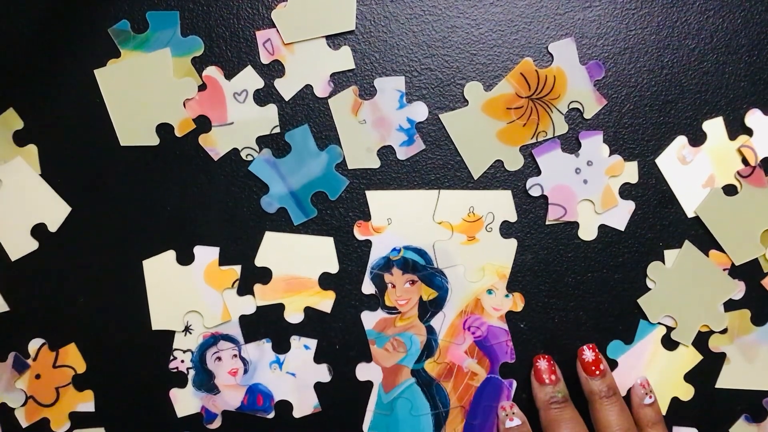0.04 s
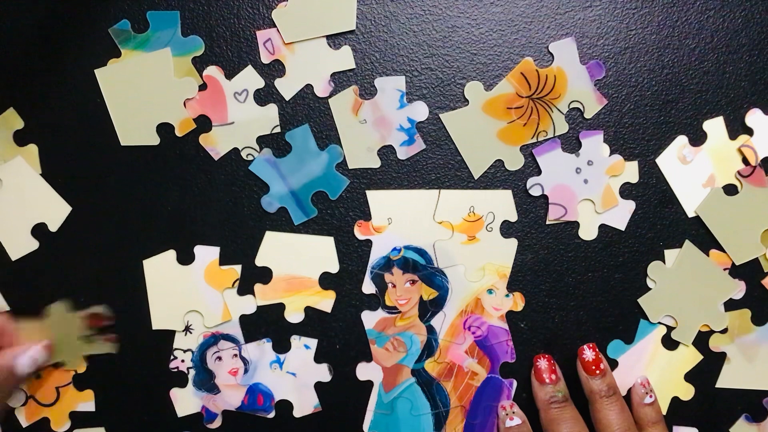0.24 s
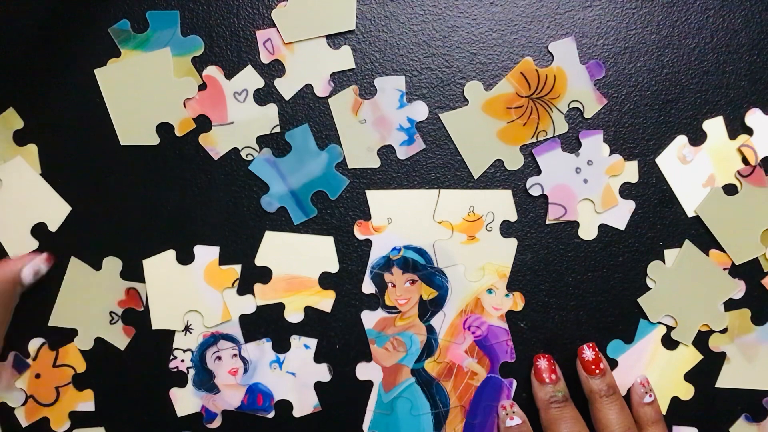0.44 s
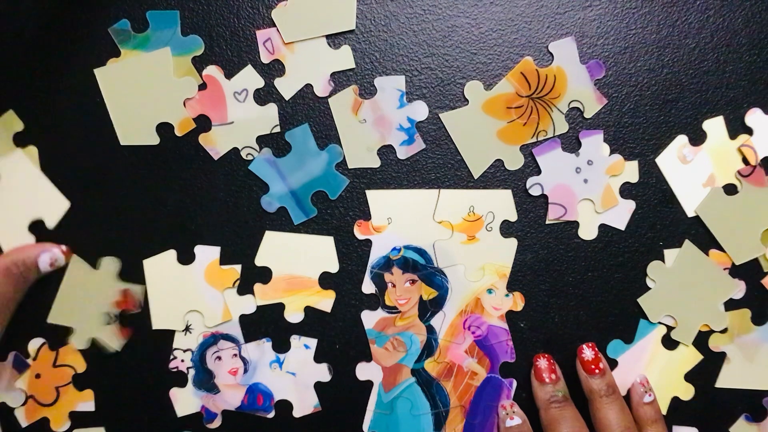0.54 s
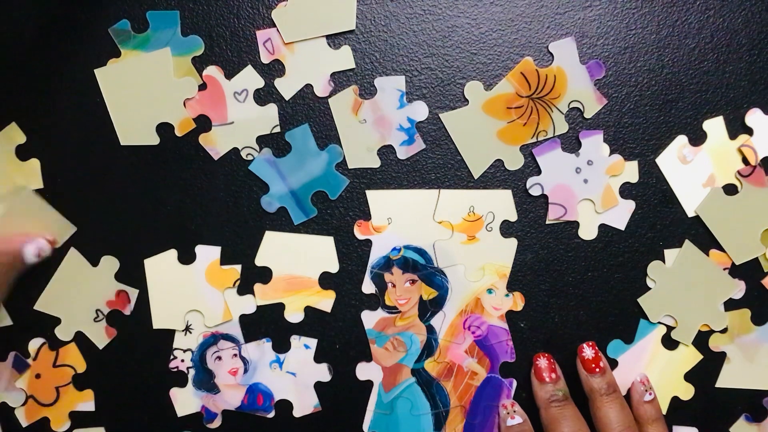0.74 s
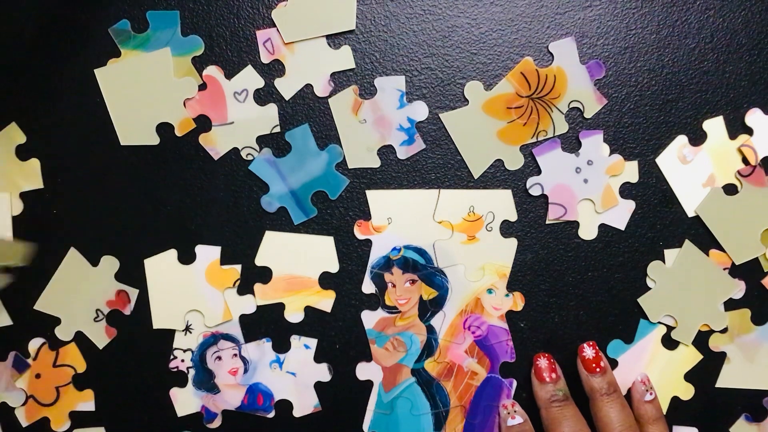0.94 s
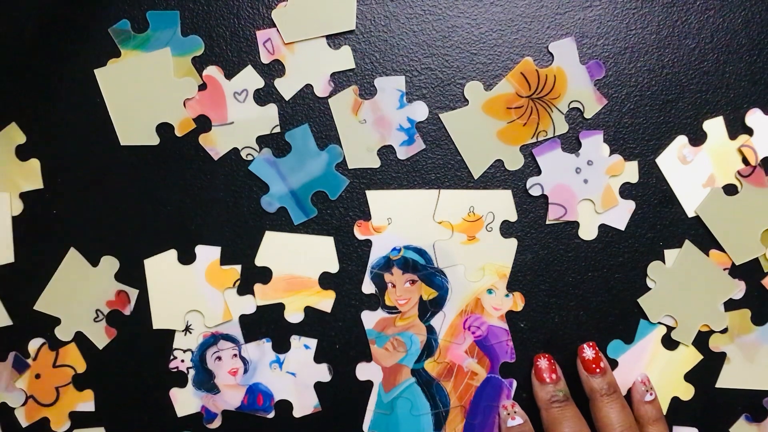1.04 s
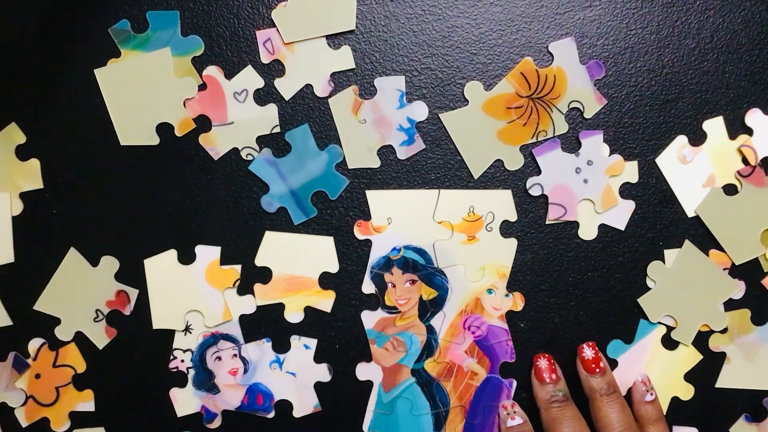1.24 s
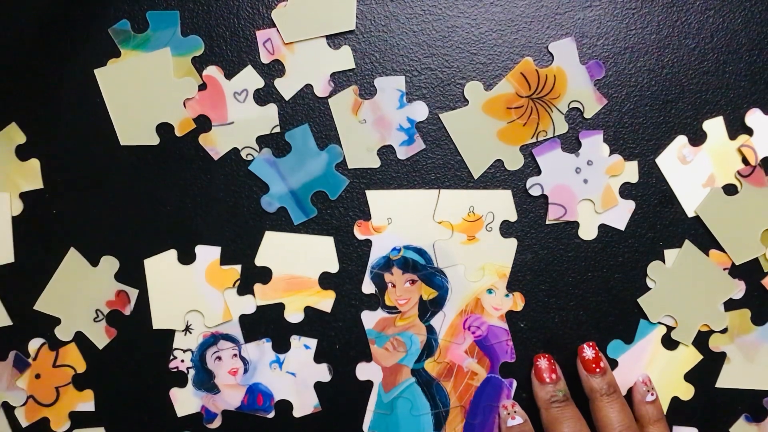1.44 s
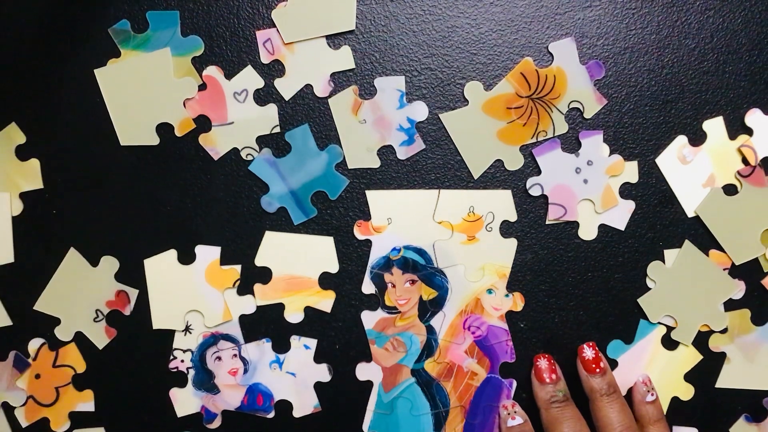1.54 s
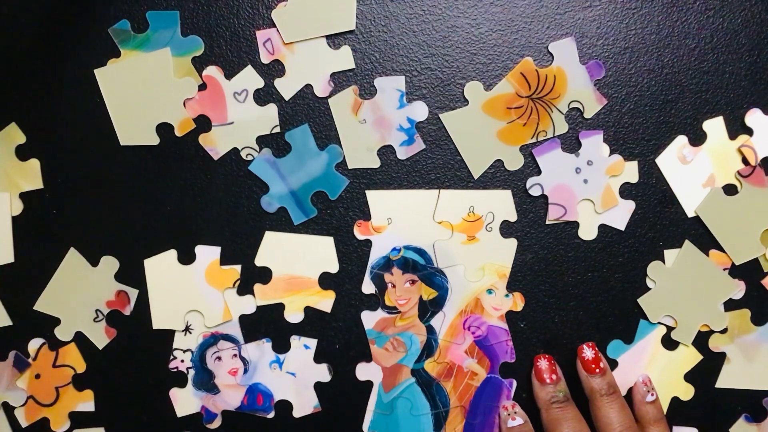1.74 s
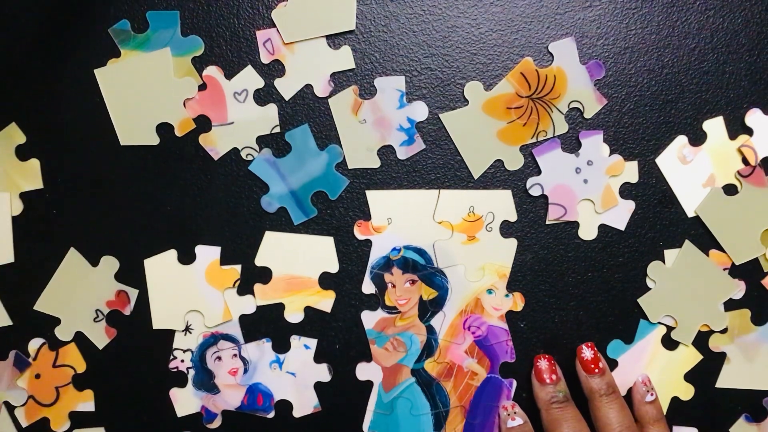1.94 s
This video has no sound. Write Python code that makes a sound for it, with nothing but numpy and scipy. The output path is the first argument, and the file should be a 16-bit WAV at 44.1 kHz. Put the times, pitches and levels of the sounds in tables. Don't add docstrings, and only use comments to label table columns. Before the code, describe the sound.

Cardboard puzzle pieces click and clack onto a hard tabletop, then slide faintly in a quiet room.

```python
import sys
import numpy as np
from scipy import signal
from scipy.io import wavfile
from scipy.ndimage import uniform_filter1d

SR = 44100
rng = np.random.default_rng(int(sys.argv[2]) if len(sys.argv) > 2 else 0)


def amplitude_ratio(level_db):
    exponent = np.asarray(level_db, float) / 20
    return 10 ** exponent


def generate_wav(sig):
    pcm = np.round(np.clip(np.atleast_2d(sig).T, -1, 1) * 32767).astype(np.int16)
    wavfile.write(sys.argv[1], SR, pcm)


N = 88200

# pitch in Hz, level in dB per Hz.
HUSH = [(24, -51), (40, 6.5), (773, -3.5), (967, -6.5), (1550, -12.5), (1850, -12), (5250, -21),
        (11400, -27), (15300, -28)]
HUSH_DB = -67
# pitch in Hz, width in Hz, level in dB.
HUSH_PEAKS = [(245, 27, -76), (725, 54, -79.5), (1280, 58, -78), (2230, 580, -80)]
# pitch in Hz, time to fall 60 dB in seconds.
ROOM = [(100, .22), (500, .23), (3000, .25), (8000, .27), (15000, .27)]
# delay in seconds, level in dB.
ECHOES = [(.0027, -15), (0.0106, -18.5)]
ROOM_DB, ROOM_LOW_DB, ROOM_TOP_HZ = -13, -9.5, 10200

# start in seconds, level in dB.
TINKS = [
    (.055, -64),
    (.091, -50.5),
    (0.259, -53.5),
    (.392, -66),
    (.406, -59),
    (1.087, -62),
]
TINK_HZ, TINK_T60_S, TINK_TAIL_DB = 15600, 0.045, -22
# start in seconds, level in dB, pitch in Hz.
SPECKS = [(.03, -59, 5060), (0.091, -58, 9600), (.322, -60, 8700), (0.427, -26.5, 4920), (.467, -52, 7040),
          (0.557, -67, 11500), (.592, -70, 14500), (0.668, -55, 5900), (0.901, -63.5, 8850),
          (1.089, -66, 8960), (1.749, -67, 9000)]
# start in seconds, length in seconds, level in dB, pitch in Hz, width in Hz.
RUB = (.98, .38, -81, 5200, 450)
# start in seconds, length in seconds, level in dB,
# pitch in Hz, width in Hz.
AIR = (.72, .135, -70, 11000, 8000)
# start in seconds, length in seconds, level in dB,
# pitch in Hz.
HUMS = [(.425, 0.067, -53, 156), (.542, 0.044, -43.5, 156), (.588, .075, -35.5, 159),
        (0.538, 0.034, -39, 343), (0.578, 0.029, -42, 318), (0.554, 0.043, -41, 83.4),
        (0.577, 0.12, -44, 99.8), (0.687, 0.034, -46.5, 263), (.69, 0.056, -43, 152),
        (.74, 0.072, -54.5, 154), (1.337, 0.053, -51.5, 284)]
# start in seconds, length in seconds,
# level in dB, pitch in Hz.
FLUTTERS = [(0.244, 0.0048, -43, 2880), (.280, 0.0063, -58, 3100), (.3478, 0.002, -44, 6200),
            (.348, 0.0028, -28.5, 2540), (0.344, 0.0034, -30, 10200), (0.3542, .005, -44, 6260),
            (.357, 0.0024, -40, 9800), (0.373, .012, -45, 3260), (0.542, 0.0022, -32.5, 3020),
            (0.553, 0.013, -39, 5100), (.554, 0.017, -44.5, 3040), (.555, .007, -53, 8500),
            (0.558, 0.0033, -50, 11500), (.560, 0.0058, -42, 6200), (.561, 0.0036, -51, 9500),
            (0.573, 0.0031, -46, 3000), (0.573, .005, -50, 5600), (.588, 0.0059, -43.5, 5300),
            (.591, 0.0067, -57, 8900), (.592, .003, -48, 14500), (0.604, 0.016, -55, 8950),
            (.609, 0.012, -49, 3050), (0.618, 0.0081, -49, 4300), (.652, 0.0031, -57, 3000),
            (0.667, 0.01, -51, 3070), (0.694, 0.0018, -34, 4900), (0.69, 0.0034, -30, 2137),
            (0.691, .002, -45, 9400), (.699, 0.0091, -40, 3250), (.700, 0.0038, -51, 9650),
            (0.714, 0.0092, -47, 3060), (0.7211, 0.0012, -41, 3080), (.726, 0.0062, -41.5, 3500),
            (.735, 0.0094, -59, 3310), (1.32, 0.021, -51.5, 2830), (1.3195, 0.0023, -45.5, 784),
            (1.332, 0.0092, -55, 2900), (1.333, 0.0032, -52, 5700), (1.393, 0.0034, -60, 2800),
            (1.381, 0.007, -52, 660)]
FLUTTER_WIDTH = 0.14

# start in seconds, length in seconds, table rumble in dB, deep thrum in dB,
# card scrape in dB.
SLIDES = [
    (0, 0.1, -67.5, -68, -76),
    (0.534, 0.051, -48.5, -54, -51),
    (0.563, 0.1, -51, -50.5, -58.5),
    (0.667, 0.096, -55, -58, -67),
    (0.8, 0.083, -69.5, -77, -73.5),
    (0.985, 0.49, -92, -96, -81.5),
    (1.362, 0.11, -73, -65.5, -79.5),
    (1.656, 0.16, -61.5, -71, -75.5),
    (1.76, 0.034, -58, -62, -64),
]
SLIDE_RISE, SLIPS_PER_S, SLIP_SPREAD_DB, SCRAPE_TOP_HZ = 0.2, 8000, 3.8, 10200

# pitch in Hz, level in dB, time to fall 60 dB in seconds.
TABLE = [(246.3, 4.5, 0.046), (300, -1, 0.088), (349.5, 2, 0.057), (420, 9, 0.035), (511.7, 6, 0.042),
         (610.6, 7, 0.033), (702, -9.5, 0.087), (771, -1.5, 0.059), (898, 2.5, 0.02), (1017, -7.5, 0.099)]
# pitch in Hz, level in dB, time to fall 60 dB in seconds.
DEEP = [(72, -10, 0.09), (101, -5, 0.11), (123.6, -21.5, 0.36), (159, -0.5, .18)]
PANEL_RISE_S, DEEP_RISE_S, MODE_SPREAD_DB = 0.00072, 0.0043, 3.0
# start in seconds, panel level in dB, deep thud in dB,
# favoured pitch in Hz.
KNOCKS = [(0.238, -33.5, -52.5, 450), (0.2446, -35, -71, 487), (0.255, -42, -57, 506),
          (.345, -25, -40.5, 514), (.353, -36, -41.5, 447), (0.428, -32.5, -46.5, 420),
          (.464, -35.5, -50.5, 525), (0.539, -37.5, -44, 306), (0.561, -35.5, -66, 300),
          (.582, -40.5, -36, 340), (0.604, -71, -59, 348), (0.689, -28, -43, 440),
          (.724, -42.5, -44.5, 486), (.755, -69, -58, 400), (1.3218, -41, -62, 524),
          (1.333, -48.5, -55.5, 330), (1.377, -45, -67, 725), (1.405, -56, -88, 300),
          (1.772, -47, -47, 550), (1.79, -73, -52, 330), (1.745, -51.5, -54.5, 615)]
FAVOUR_DB = 5.5

# start in seconds, level in dB, pitch in Hz,
# width in Hz.
SNAPS = [(.3451, -17.5, 6300, 1100), (.3452, -26, 10300, 2000), (.3474, -27, 5300, 1500),
         (.5408, -28, 8600, 1800), (.4636, -37, 5000, 1100), (.6888, -18, 3300, 1300),
         (.6886, -26, 6500, 1400), (.6886, -26, 9800, 1500), (.7244, -32, 3200, 800),
         (1.3787, -43, 1100, 900), (1.3785, -47, 4300, 1500), (1.7725, -49, 5000, 4000),
         (.5410, -32, 3100, 1200)]
SNAP_S, SNAP_GRIT = 0.00029, 0.35
# start in seconds, hollow click in dB, face slap in dB, edge crack in dB,
# edge pitch in Hz.
TAPS = [(0.2375, -44.5, -54.5, -66, 4600), (0.2488, -46, -62, -79, 5400), (0.3419, -34, -38.5, -32.5, 6500),
        (0.345, -25, -45, -26, 6360), (0.3568, -45, -43, -63, 6020), (0.4264, -35, -39, -31, 5240),
        (0.4411, -40, -51, -71, 5000), (0.4626, -40, -49.5, -43, 4230), (0.4827, -44.5, -49.5, -59, 4400),
        (0.5404, -34.5, -44, -30.5, 7650), (0.5566, -64, -64, -46, 5800), (0.5896, -61, -80, -61, 4660),
        (0.6218, -56, -66, -52.5, 4460), (0.6528, -55, -54.5, -72, 6380), (0.6884, -25.5, -36, -24, 6070),
        (0.7245, -28.5, -48.5, -50, 4900), (1.3223, -60, -48, -54, 6060), (1.333, -62, -62, -57, 5600),
        (1.3781, -49, -44, -77, 4510), (1.7478, -48, -53, -56.5, 8700), (1.7715, -50, -48, -50, 5200)]
# pitch in Hz, width in Hz, level in dB.
HOLLOW = [(2550, 1700, -13.5), (3020, 364, 10), (3590, 310, -7), (4680, 2000, -3)]
# pitch in Hz, width in Hz, level in dB.
SLAP = [(1020, 910, 0.5), (1450, 350, 5), (2040, 400, -1.5)]
# pitch in Hz, width in Hz, level in dB.
EDGES = [(4300, 1980, -17), (4660, 770, -1), (6020, 1900, -10), (7920, 3600, -37), (9320, 1100, -10.5),
         (11630, 4200, -15), (14500, 5100, -15.5)]
OWN_WIDTH_HZ, OWN_DB = 320, -2.5
CLICK_DB, SLAP_DB, EDGE_DB = -1, 4, 2
CRACK_S, CHATTER_DB, CHATTER_S = 0.00029, -5.5, 0.0038
HARD_DB, SOFTEN_DB = -28.5, 17
SOFT_SIDE_DB = -3.5


def evened(x):
    return x / np.sqrt(np.mean(x ** 2) + 1e-20)


def peaked(x):
    return x / abs(x).max()


def read(points, hz):
    f, value = np.transpose(points)
    return np.interp(np.log(hz + 1), np.log(f + 1), value)


def add(mix, s, sound):
    part = mix[max(round(s * SR), 0):][:len(sound)]
    part += sound[:len(part)]


def progress(length_s):
    return np.arange(0, length_s, 1 / SR) / length_s


def dull(x, hz):
    return signal.sosfilt(signal.butter(2, min(hz, 0.45 * SR), fs=SR, output="sos"), x)


def resonate(x, hz, width_hz):
    r = np.exp(-np.pi * width_hz / SR)
    return signal.lfilter([1 - r, 0, r - 1], [1, -2 * r * np.cos(2 * np.pi * hz / SR), r * r], x)


def bank(x, peaks):
    return sum((-1) ** k * amplitude_ratio(db) * resonate(x, hz, w) for k, (hz, w, db) in enumerate(peaks))


def ring(modes, rise_s, chance):
    t = np.arange(SR // 3) / SR
    x = 0
    for k, ((hz, db, t60), c) in enumerate(zip(modes, chance)):
        level = amplitude_ratio(db + MODE_SPREAD_DB * c - 60 * t / t60)
        x = x + (-1) ** k * level * np.sin(2 * np.pi * hz * t)
    return peaked(x * (1 - np.exp(-t / rise_s)))


def crack(noise, length_s):
    t = np.arange(len(noise)) / SR
    chatter = amplitude_ratio(CHATTER_DB) * np.exp(-t / CHATTER_S) * noise[::-1] ** 2 / 2
    return noise * (1 - np.exp(-2 * t / length_s)) * (np.exp(-t / length_s) + chatter)


def hush():
    frames, hz = N // 256 + 5, np.fft.rfftfreq(1024, 1 / SR)
    a, b, patches = rng.standard_normal((frames, 513, 3)).T
    patches = evened(uniform_filter1d(uniform_filter1d(patches, 12, 0), 14, 1))
    spectrum = (a + 1j * b) * amplitude_ratio(read(HUSH, hz)[:, None] + 1.1 * patches)
    noise = signal.istft(spectrum, nperseg=1024, noverlap=768)[1][:N]
    humps = sum(amplitude_ratio(db) * evened(resonate(rng.standard_normal(N), f, w)) for f, w, db in HUSH_PEAKS)
    return amplitude_ratio(HUSH_DB) * evened(noise) + humps


def room(x, start_s):
    hits = np.zeros(SR // 2)
    at = np.arange(0, SR // 2 - 20, 10)
    hits[at + rng.integers(0, 10, at.shape)] = rng.choice([-1., 1.], at.shape)
    hz, t, z = signal.stft(hits, SR, nperseg=256)
    tail = signal.istft(z * amplitude_ratio(-60 * t / read(ROOM, hz)[:, None]), SR, nperseg=256)[1]
    tail = tail * np.clip(np.arange(len(tail)) / (start_s * SR), 0, 1)
    return signal.fftconvolve(x, tail / np.linalg.norm(tail))[:N]


def bangle_tinks():
    out, t = np.zeros(N), np.arange(SR // 5) / SR
    fall = amplitude_ratio(-60 * t / TINK_T60_S) + amplitude_ratio(TINK_TAIL_DB - 60 * t / 0.25)
    shape = np.minimum(t / 0.00091, 1) * fall
    for s, db in TINKS:
        noise = rng.standard_normal(len(t))
        fuzz = evened(resonate(resonate(noise, TINK_HZ, 295), TINK_HZ, 295))
        add(out, s, amplitude_ratio(db) * fuzz * shape)
    return out


def specks():
    out = np.zeros(N)
    for s, db, hz in SPECKS:
        add(out, s, amplitude_ratio(db) * peaked(resonate(crack(rng.standard_normal(900), 0.0015), hz, 0.3 * hz)))
    return out


def fingertip_rub():
    out = np.zeros(N)
    s, length, db, hz, width_hz = RUB
    u = progress(length)
    noise = evened(resonate(rng.standard_normal(len(u)), hz, width_hz))
    add(out, s, amplitude_ratio(db) * np.sin(np.pi * u) ** 0.5 * noise)
    return out


def settling_hiss():
    out = np.zeros(N)
    s, length, db, hz, width_hz = AIR
    u = progress(length)
    noise = evened(resonate(rng.standard_normal(len(u)), hz, width_hz))
    add(out, s, amplitude_ratio(db) * np.minimum(10 * u, 1) * (1 - u) * noise)
    return out


def hums():
    out = np.zeros(N)
    for s, length, db, hz in HUMS:
        t = np.arange(0, length, 1 / SR)
        swell = np.sin(np.pi * (t / length) ** 0.46)
        add(out, s, amplitude_ratio(db) * swell * np.sin(2 * np.pi * hz * t))
    return out


def flutters():
    out = np.zeros(N)
    for s, length, db, hz in FLUTTERS:
        u = np.minimum(np.arange(1200) / SR / length, 1)
        rub = rng.standard_normal(1200) * np.sin(np.pi * np.sqrt(u))
        width_hz = FLUTTER_WIDTH * hz
        add(out, s, amplitude_ratio(db) * peaked(resonate(resonate(rub, hz, width_hz), hz, 2 * width_hz)))
    return out


def scrape(slips, patch):
    out = 0
    peaks = SLAP + HOLLOW + EDGES
    for k, (hz, w, db) in enumerate(peaks):
        out = out + amplitude_ratio(db) * resonate(slips * (patch % len(peaks) == k), hz, w)
    return dull(out, SCRAPE_TOP_HZ)


def slides():
    high, low = np.zeros(N), np.zeros(N)
    slips = (rng.random((3, N)) < SLIPS_PER_S / SR) * rng.choice([-1., 1.], (3, N))
    slips = slips * amplitude_ratio(SLIP_SPREAD_DB * np.minimum(rng.exponential(1, (3, N)), 4))
    calm = np.zeros(16)
    bodies = [ring(TABLE, 0.00078, calm), ring(DEEP, 0.0012, calm)]
    patch = rng.integers(0, 840, N)
    for s, length, rumble_db, thrum_db, scrape_db in SLIDES:
        u = progress(length)
        shape = np.minimum(u / SLIDE_RISE, 1) * np.sqrt(np.clip(1 - u, 0, 1))
        start = round(s * SR)
        drive = slips[:, start:][:, :len(u)] * shape
        for d, body, db in zip(drive, bodies, (rumble_db, thrum_db)):
            x = signal.fftconvolve(d, body)
            add(low, s, amplitude_ratio(db) * x / np.sqrt(np.mean(x[:len(u)] ** 2)))
        add(high, s, amplitude_ratio(scrape_db) * evened(scrape(drive[2], patch[start:][:len(u)])))
    return high, low


def table_knocks():
    out = np.zeros(N)
    for s, panel_db, thud_db, centre_hz in KNOCKS:
        chance = rng.standard_normal(16)
        panel = [(hz, db - FAVOUR_DB * np.log2(hz / centre_hz) ** 2, t60) for hz, db, t60 in TABLE]
        add(out, s, amplitude_ratio(panel_db) * ring(panel, PANEL_RISE_S, chance))
        add(out, s, amplitude_ratio(thud_db) * ring(DEEP, DEEP_RISE_S, chance[-4:]))
    return out


def snaps():
    out, t = np.zeros(N), np.arange(600) / SR
    for s, db, hz, width_hz in SNAPS:
        blow = (t == 0) + SNAP_GRIT * rng.standard_normal(600) * np.exp(-t / SNAP_S)
        add(out, s, amplitude_ratio(db) * peaked(resonate(resonate(blow, hz, width_hz), hz, width_hz)))
    return out


def card_taps():
    out = np.zeros(N)
    for s, click_db, slap_db, edge_db, hz in TAPS:
        a, b, c = rng.standard_normal((3, 1500))
        softness = max(HARD_DB - max(click_db, edge_db), 0) / SOFTEN_DB
        length_s = CRACK_S * 2 ** softness
        hollow = [(f, w, db + (db < HOLLOW[1][2]) * SOFT_SIDE_DB * softness) for f, w, db in HOLLOW]
        click = bank(resonate(crack(a, length_s), 2350, 2700), hollow)
        add(out, s, amplitude_ratio(click_db + CLICK_DB) * peaked(click))
        burst = np.diff(crack(b, length_s), prepend=0)
        edge = bank(burst, EDGES) + amplitude_ratio(OWN_DB) * resonate(burst, hz, OWN_WIDTH_HZ)
        edge = dull(edge, 16000 * (CRACK_S / length_s) ** 0.3)
        add(out, s, amplitude_ratio(edge_db + EDGE_DB) * peaked(edge))
        slap = dull(bank(crack(c, length_s), SLAP), 4500)
        add(out, s, amplitude_ratio(slap_db + SLAP_DB) * peaked(slap))
    return out


def scene():
    card_scrape, rumble = slides()
    high = card_taps() + card_scrape + fingertip_rub() + specks() + snaps() + bangle_tinks()
    low = table_knocks() + rumble
    rubs = flutters() + settling_hiss()
    mix = high + low + rubs + hums() + hush()
    mix += amplitude_ratio(ROOM_DB) * room(dull(high, ROOM_TOP_HZ), 0.015)
    mix += amplitude_ratio(ROOM_LOW_DB) * room(low, 0.013)
    mix += amplitude_ratio(ROOM_DB - 1.0) * room(dull(rubs, ROOM_TOP_HZ), 0.008)
    for s, db in ECHOES:
        add(mix, s, amplitude_ratio(db) * high)
    return mix[None]


def band_limit(x):
    return signal.sosfilt(signal.butter(12, 16800, fs=SR, output="sos"), x)


def record(dry):
    x = signal.sosfilt(signal.butter(4, 62, "highpass", fs=SR, output="sos"), dry)
    top_cut = signal.firwin(255, 15900, window=("kaiser", 9), fs=SR)
    x = signal.oaconvolve(x, top_cut[None], "same")
    return band_limit(x)


dry = scene()
out = record(dry)
generate_wav(out)
```